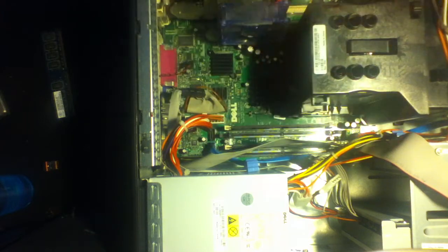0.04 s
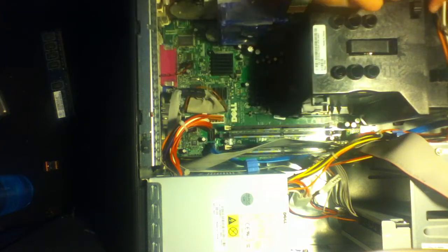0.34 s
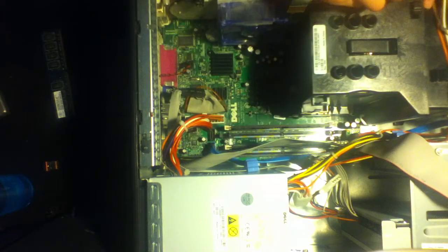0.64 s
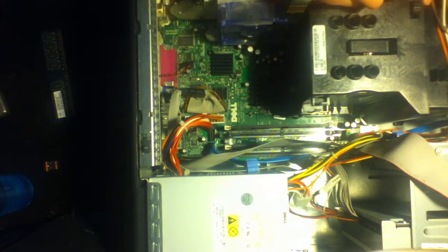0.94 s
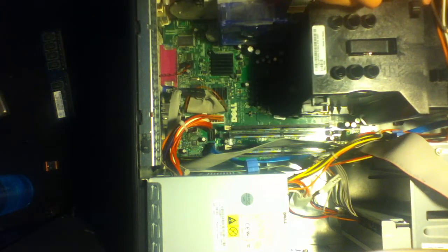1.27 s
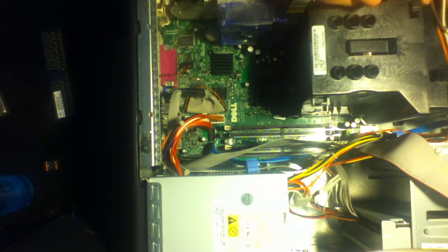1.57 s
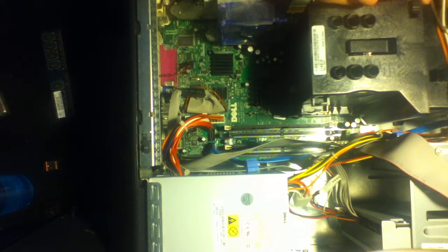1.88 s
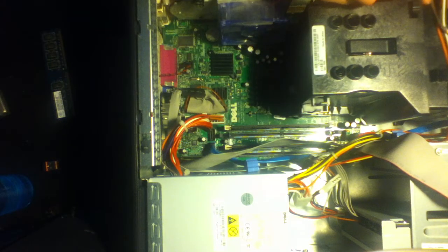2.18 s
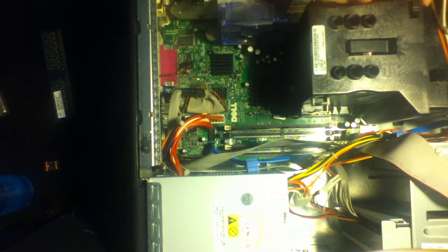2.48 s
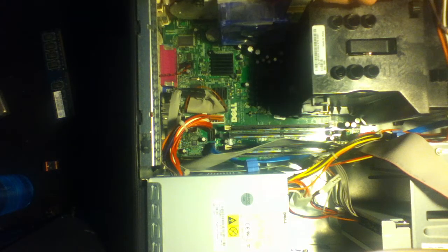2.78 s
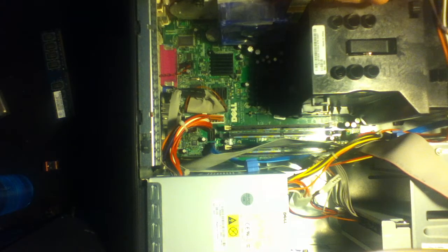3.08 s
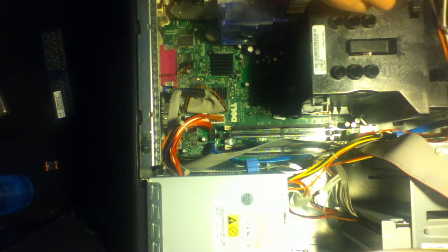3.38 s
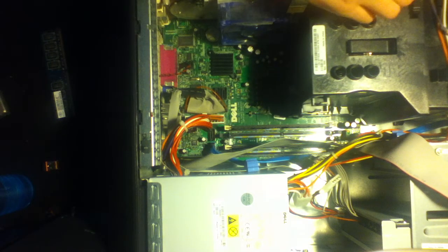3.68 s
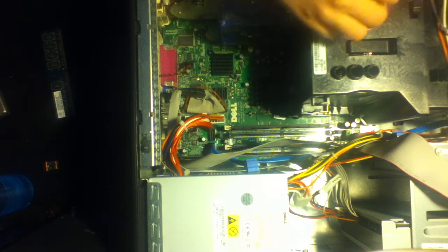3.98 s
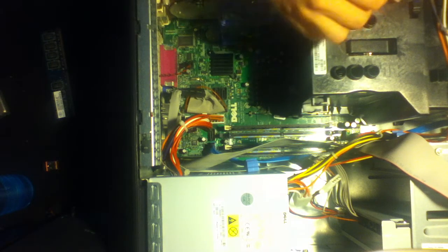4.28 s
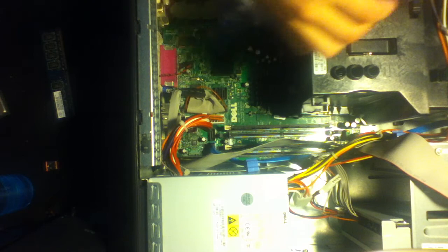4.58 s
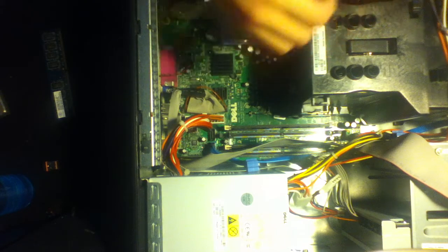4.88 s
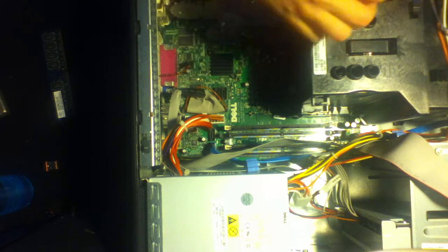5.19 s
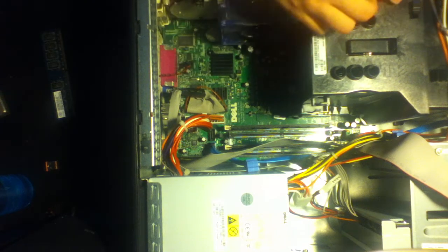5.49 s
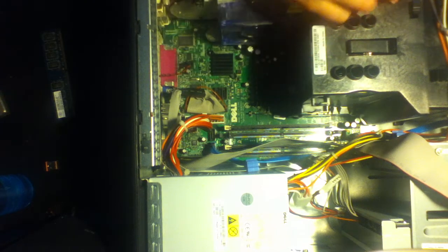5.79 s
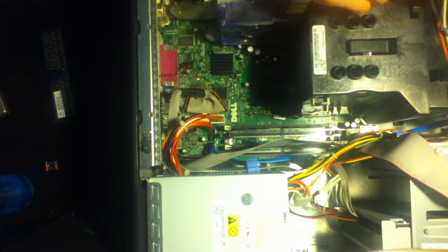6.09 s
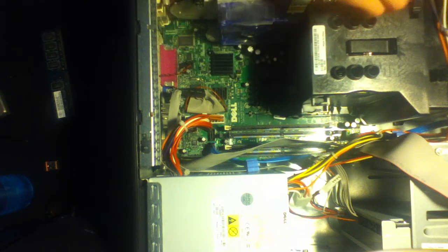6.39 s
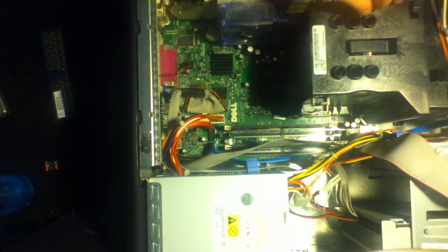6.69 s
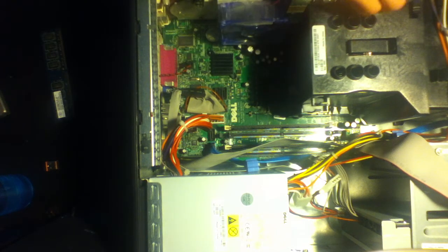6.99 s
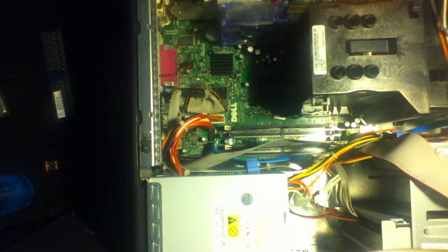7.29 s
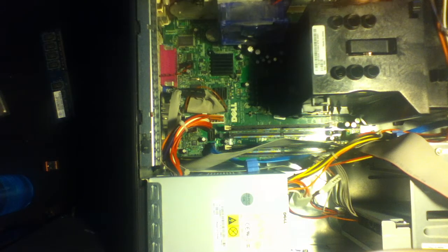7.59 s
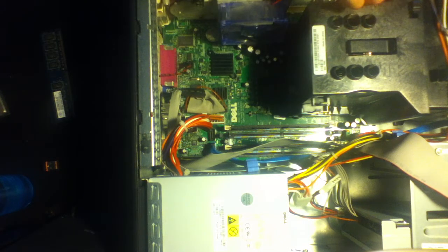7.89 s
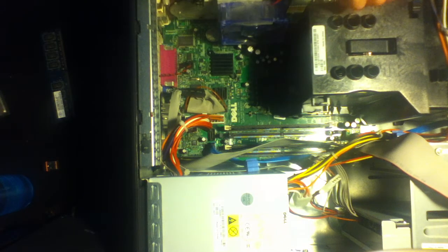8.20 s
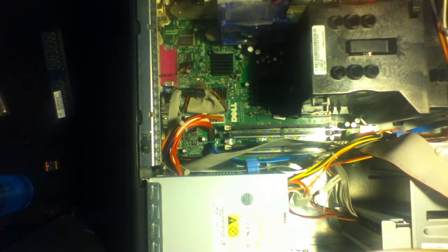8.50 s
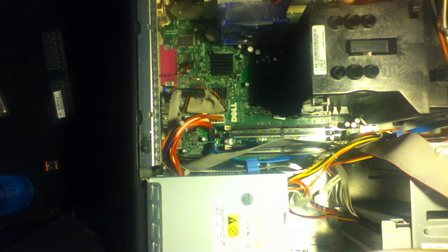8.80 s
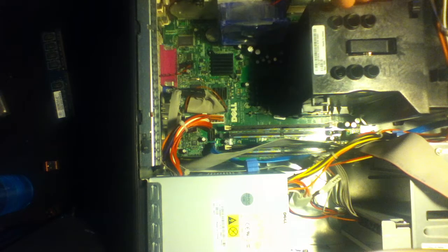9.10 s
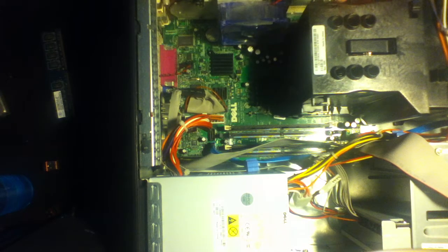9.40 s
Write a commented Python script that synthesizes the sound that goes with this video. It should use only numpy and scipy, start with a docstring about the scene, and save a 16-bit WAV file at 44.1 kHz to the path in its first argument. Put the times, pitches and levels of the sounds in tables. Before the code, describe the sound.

A screwdriver works small spring-loaded screws in an open steel computer case, heard close in a small room over faint steady hiss and low hum. Two clear metallic ticks ring briefly at about 0.2 seconds. Soft scattered ticks and short thread rasps follow, with a faint wavering squeak near 1.7 seconds. At about 3.1 seconds a screw snaps free and its spring hits home with a sharp, bright click. A cluster of clicks, a tiny squeak and a dull knock come between 4 and 4.4 seconds. A louder knock on the case with a brief squeak lands near 4.8, and a firm click just after 5. From 6 to 7 seconds the tip ticks quickly amid quiet scraping turns. More clicks, short rasps and soft bumps come around 7.5 to 8 seconds, then a low judder, a clear click at 9 and one last small rasp.

```python
"""A screwdriver works the spring-loaded screws of a heatsink in an open steel computer case.
Its tip ticks in the screw heads, ringing heatsink, panels and a bracket. Threads rasp in tiny slips
and squeak when the slips lock into a pitch. Hand and handle knock the chassis; one screw snaps free
and its spring slams home. A small room reverberates over faint hum and hiss."""
import sys
import numpy as np
from scipy import signal
from scipy.fft import rfft, irfft
from scipy.io import wavfile
from scipy.ndimage import uniform_filter1d

SR = 44100
rng = np.random.default_rng(int(sys.argv[2]) if len(sys.argv) > 2 else 0)


def dump_mix(stems):
    """Bounce the given channels to the path in sys.argv[1] as a 16-bit WAV at rate SR."""
    frames = np.atleast_2d(stems).T  # one column per channel
    limited = np.clip(frames, -1, 1)  # hard clip at full scale
    pcm = np.round(limited * 32767).astype(np.int16)
    wavfile.write(sys.argv[1], SR, pcm)


N = 416744
EVENT_SAMPLES, ATTACK_SAMPLES = 24576, int(.025 * SR)
T = np.arange(EVENT_SAMPLES) / SR

# hiss and room rumble: (frequency [Hz], relative density [dB])
AIR_SPECTRUM = [(15, -46), (25, -37.5), (48, -9.5), (173, -6), (297, -9.5), (331, -10.5), (445, -14.5),
                (552, -16.5), (1110, -20.5), (1240, -21), (1450, -24.5), (2360, -24.5), (2770, -27),
                (4750, -27.5), (15500, -32.5)]
# hum: (frequency [Hz], level [dB])
HUM_TONES = [(58, -72.5), (113, -67)]
# screw turns: (start [s], end [s], level [dB])
SCREW_TURNS = [(0.048, 0.102, -51), (0.418, 0.492, -50.5), (0.863, 0.943, -55.5), (1.028, 1.161, -53.5),
               (2.499, 2.686, -60), (3.991, 4.08, -52), (5.896, 5.95, -49), (6.009, 6.16, -48),
               (6.707, 6.866, -49), (7.442, 7.58, -49.5), (7.931, 7.993, -38), (8.081, 8.116, -52),
               (8.76, 8.854, -45.5), (8.95, 8.982, -50), (9.321, 9.398, -46.5)]
# tip on screw; strength = mid band, weight = body over mid, hardness = treble over mid:
# (time [s], strength [dB], weight [dB], hardness [dB], pitch of touched part [Hz])
TIP_TICKS = [(0.056, -56, -3, -0.5, 698), (0.085, -51.5, 7, -3, 615), (0.186, -31, 2.5, -2, 4800),
             (0.2598, -35, 5.5, 0, 3066), (0.545, -47, 4, -7.5, 597), (0.6654, -56, 9, -5, 807),
             (0.739, -51, 4.5, 7.5, 2940), (0.9222, -54.5, 9, -9, 838), (1.0058, -53.5, -7, -1, 3100),
             (1.069, -48, -4.5, 0, 3030), (1.094, -45.5, -8, 3.5, 3550), (1.227, -61.5, -6, -6, 3620),
             (1.4663, -53.5, -3.5, 4.5, 2910), (1.531, -51.5, -10.5, 13, 6150),
             (1.634, -56.5, -6, -5, 1144), (1.8332, -54, 11.5, 14, 780), (1.851, -55, 12, -6, 790),
             (2.0366, -52.5, 5.5, 8, 5790), (2.3366, -47, 9.5, -9, 570), (2.365, -59, 5, 0, 2410),
             (2.4476, -59.5, -8, 8, 7360), (2.6826, -46.5, 4.5, -2.5, 587), (2.714, -59.5, 2, 6, 847),
             (2.99, -59.5, 3, -4, 590), (3.482, -36.5, -1, -9.5, 2315), (3.6549, -52, 5.5, -4.5, 900),
             (3.6901, -42.5, 1.5, -6.5, 1970), (3.861, -58.5, -3, -0.5, 1204), (3.9078, -54.5, 7, -20, 867),
             (3.926, -45, 5, -5.5, 785), (4.0916, -33.5, -4.5, -7, 1216), (4.146, -34, -4, -7.5, 878),
             (4.166, -32.5, -1, -8.5, 1998), (4.2382, -48, 0, -12, 1226), (4.3748, -34, -2, -6, 2016),
             (4.412, -50, 8, -17, 879), (4.517, -64, 14, -13, 952), (5.076, -28.5, -1.5, -6, 1473),
             (5.2936, -56.5, 7.5, -14, 818), (5.34, -58.5, 4.5, -12, 790), (5.365, -61.5, -1, -0.5, 965),
             (5.57, -53, 1.5, -13.5, 832), (5.7764, -62, 10, -6, 808), (5.927, -52, -10, -1, 4300),
             (6.0515, -39, 0.5, -7.5, 958), (6.1451, -36, -0.5, -9, 937), (6.189, -50, 6, -7, 957),
             (6.2903, -34.5, -2.5, -5, 917), (6.3504, -42.5, 4, -5, 816), (6.4301, -43, 0, -12.5, 2130),
             (6.551, -30, -3.5, -3, 2265), (6.6047, -37.5, 0.5, -7.5, 2790), (6.7138, -56, 7, -3, 615),
             (6.8225, -49, 4.5, -9, 710), (6.858, -57, 7, 2, 607), (6.9649, -36.5, 0, -6.5, 2830),
             (6.996, -62, 18, 5, 926), (7.154, -50, 10.5, -8, 638), (7.4131, -62.5, 12, -3, 610),
             (7.6257, -37, 2.5, -2.5, 800), (7.7616, -49.5, 9, -6, 653), (7.931, -28.5, -0.5, -5, 1513),
             (7.9754, -34, 1.5, -4.5, 1840), (9, -32, 3, 0, 1557)]
# squeaks and a low judder: (peak time [s], pitch [Hz], level [dB], 1/e decay [s], pitch waver [ratio])
STICK_SLIPS = [(1.744, 1695, -52, 0.038, 0.38), (3.297, 1134, -51, 0.013, .06),
               (4.026, 2890, -32.5, 0.0062, .03), (4.839, 2900, -30.5, .005, .11),
               (5.93, 4650, -42, 0.016, .07), (8.818, 106.3, -46, 0.06, 0.17)]
# dull chassis blows: (time [s], strength [dB], weight [dB], hardness [dB])
CHASSIS_KNOCKS = [(2.2882, -47.5, 7, -2.5), (4.1257, -35, 12, -6), (4.849, -28, 10.5, -3.5),
                  (7.576, -46, 15.5, -7.5), (8.076, -42.5, 10, -12.5), (8.9052, -44.5, 6.5, -13)]
# screw and spring release: (time [s], strength [dB], weight [dB], hardness [dB], reflection t60 [s])
SNAP_BLOWS = [(3.0996, -44.5, 7, -8, .035), (3.1027, -34.5, -6.5, 16, .065), (3.1098, -26, -5, 6.5, 0.078)]
# screw and heatsink modes: (frequency [Hz], level [dB], t60 [s])
HEATSINK_MODES = [(1955, -2, .12), (2290, -3, .09), (2547, 0, .11), (2791, -2, .09), (3102, -1, .08),
                  (3414, -3, .09), (3548, 2, .1), (3652, 1, .08), (4005, -19, .28), (4736, 0, .07),
                  (4835, 0, .07), (4952, -1, .07), (5406, -2, .065), (5793, -2, .065), (6146, 2, .07),
                  (6460, 1, .075), (7504, -2, .055), (8016, -28, .55), (8280, -3, .05), (9169, 1, .05),
                  (9620, 0, .05)]
# chassis panel modes: (frequency [Hz], level [dB], t60 [s])
CHASSIS_MODES = [(112, -14, .35), (282, -13, .3), (365, -3, .27), (415, -9, .2), (463, -6, .16),
                 (560, -3, .09), (612, 2, .13), (668, -3, .12), (792, -1, .13), (850, -2, .16),
                 (930, 0, .13), (1025, -4, .11), (1105, -2, .13), (1240, -3, .13), (1400, -4, .1),
                 (1510, 0, .15), (1690, -4, .13), (1825, -4, .12), (2024, -3, .13), (2175, -4, .12)]
# bracket modes: (frequency [Hz], level [dB], t60 [s])
BRACKET_MODES = [(603, -4, .3), (790, -11, .22), (846, 0, .26), (930, -12, .24), (1480, -6, .2)]
# bracket ring, free until the hand holds it: (time [s], gain [dB])
BRACKET_GAIN = [(.1, -13), (.18, 19), (.85, 6), (1.05, -4.5)]
# thread rasp colour: (frequency [Hz], gain [dB])
RASP_EQ = [(150, -3.5), (400, 4), (850, 5), (1400, -2), (2400, -3.5), (3050, 1.5), (3800, -4), (6300, -4),
           (7800, -6), (9600, -7.5), (11000, -12.5), (15500, -24)]
# case colour on each impact: (frequency [Hz], gain [dB])
CASE_EQ = [(60, -13), (180, 3.5), (280, -5.5), (370, 8.5), (510, -0.5), (610, 2.5), (900, 2.5), (1250, -2),
           (2400, -2), (4000, -6), (6500, 0.5), (9600, 4), (11000, -4), (15500, -15.5)]
# colour of the spring's blow: (frequency [Hz], gain [dB])
SPRING_EQ = [(350, 0), (450, -0.5), (900, 2), (1300, -4.5), (2200, -1.5), (3500, 4), (5200, 0.5),
             (8000, -2.5), (12500, 0.5)]
# bass, body, mid, treble and top bands: (edge [Hz])
BAND_EDGES_HZ = [80, 300, 1000, 2800, 7000, 15000]
BAND_CENTRES_HZ = np.sqrt(np.multiply(BAND_EDGES_HZ[:-1], BAND_EDGES_HZ[1:]))
BAND_FILTERS = [signal.butter(3, edges, "band", fs=SR, output="sos")
                for edges in zip(BAND_EDGES_HZ, BAND_EDGES_HZ[1:])]


def undb(db):
    """Decibels to gain."""
    return 10 ** (np.asarray(db) / 20)


def unit_rms(x):
    """Scale to rms 1."""
    return x / np.sqrt(np.mean(x ** 2))


def fade(t60_s):
    """Exponential decay, -60 dB at t60_s."""
    return np.exp(-np.log(1000) * T / max(t60_s, 1e-3))


def colour(x, points):
    """Minimum-phase filter through (frequency [Hz], gain [dB]) points."""
    hz, db = np.transpose(points)
    bins_hz = np.fft.rfftfreq(EVENT_SAMPLES, 1 / SR) + 1e-3
    gain = undb(np.interp(np.log(bins_hz), np.log(hz), db))
    cepstrum = irfft(np.log(gain))
    cepstrum[1:EVENT_SAMPLES // 2] *= 2
    cepstrum[EVENT_SAMPLES // 2:] = 0
    impulse = irfft(np.exp(rfft(cepstrum)))[:EVENT_SAMPLES // 16]
    return signal.fftconvolve(x, impulse)[:len(x)]


def wander(rate_hz, samples=N):
    """Smooth random curve, rms 1."""
    step = int(SR / rate_hz)
    stairs = np.repeat(rng.standard_normal(samples // step + 1), step)
    return unit_rms(uniform_filter1d(stairs, step)[:samples])


def add(out, time_s, x):
    """Mix x in at time_s."""
    i = int(time_s * SR)
    out[i:i + len(x)] += x[:N - i]


def ring(hz, db, t60_s):
    """One decaying sine."""
    return undb(db) * fade(t60_s) * np.sin(2 * np.pi * hz * T)


def mode_bank(modes):
    """One row per mode."""
    return np.array([ring(*mode) for mode in modes])


def strike(bank):
    """A random contact point sets each mode's size and sign."""
    return np.cos(2 * np.pi * rng.random(len(bank))) @ bank


def split_noise(split_hz):
    """Low and high parts of one white noise."""
    noise = rng.standard_normal(EVENT_SAMPLES)
    low = signal.sosfilt(signal.butter(1, split_hz, fs=SR, output="sos"), noise)
    return low, noise - low


def reflections(t60_s, treble_t60_ratio=0.31, hold_s=0.0041):
    """Dense echoes between steel walls hold, then fade, treble first."""
    low, high = split_noise(split_hz=2600)
    slow = np.interp(T - hold_s, T, fade(t60_s))
    fast = np.interp(T - hold_s, T, fade(t60_s * treble_t60_ratio))
    return low * slow + high * fast


def band_levels(strength_db, weight_db, hardness_db, bass_db, top_db, top_slope=0.35):
    """Five impact levels [dB]; bass follows body, top follows treble."""
    body_db, treble_db = strength_db + weight_db, strength_db + hardness_db
    top_rise_db = top_slope * (hardness_db - weight_db)
    return [body_db + bass_db, body_db, strength_db, treble_db, treble_db + top_db + top_rise_db]


def shape_impact(x, bands_db):
    """Apply the case colour, then bring the attack toward bands_db."""
    x = colour(x, CASE_EQ)
    for _ in range(2):
        attack_db = [20 * np.log10(np.std(signal.sosfilt(sos, x[:ATTACK_SAMPLES])))
                     for sos in BAND_FILTERS]
        x = colour(x, np.column_stack([BAND_CENTRES_HZ, np.subtract(bands_db, attack_db)]))
    return x


def background(air_db=-57.5, waver_db=0.63, drift_rad=0.83):
    """Even hiss, room rumble and wavering hum."""
    t = np.arange(N) / SR
    air = unit_rms(colour(rng.standard_normal(N), AIR_SPECTRUM))
    air *= undb(air_db + waver_db * wander(25))
    hum = sum(undb(db) * np.sin(2 * np.pi * hz * t + drift_rad * wander(9.4)) for hz, db in HUM_TONES)
    return air + hum


def threads(slips_per_s=850, spread_db=3, edge_s=0.023, heatsink_db=-21, grit_db=3, swell_db=2.1):
    """Each turn drags thread and spring through tiny slips that ring the heatsink."""
    out, heatsink = np.zeros(N), mode_bank(HEATSINK_MODES)
    spots = 2  # thread and spring, each with its own ring
    for start_s, end_s, level_db in SCREW_TURNS:
        effort = np.clip(np.minimum(T, end_s - start_s + edge_s - T) / edge_s, 0, 1)
        pressure_db = grit_db * wander(91, EVENT_SAMPLES) + swell_db * wander(27.5, EVENT_SAMPLES)
        rasp = np.zeros(EVENT_SAMPLES)
        for _ in range(spots):
            sizes = undb(spread_db * np.minimum(rng.exponential(size=EVENT_SAMPLES), 4) + pressure_db)
            slipping = rng.random(EVENT_SAMPLES) < slips_per_s / spots / SR
            slips = slipping * rng.choice([-1, 1], EVENT_SAMPLES) * sizes * effort
            response = reflections(t60_s=.04, hold_s=0) + undb(heatsink_db) * strike(heatsink)
            rasp += signal.fftconvolve(slips, response)[:EVENT_SAMPLES]
        rasp = colour(rasp, RASP_EQ)
        rasp *= np.linalg.norm(effort) / np.linalg.norm(rasp)
        add(out, start_s - edge_s / 2, undb(level_db) * rasp)
    return out


def ticks(click_db=5, chassis_db=-19, heatsink_db=-18, bracket_db=-24, part_db=-10.5,
          stiff_hz=450, firm_db=-32.5, soft_doubling_db=45, press_halving_db=47):
    """Steel tip on steel screw: a click, case reflections and ringing parts."""
    out, heatsink = np.zeros(N), mode_bank(HEATSINK_MODES)
    bracket = mode_bank(BRACKET_MODES).sum(axis=0)
    # the light tip barely drives low panel modes
    panel_hz = np.array(CHASSIS_MODES)[:, :1]
    chassis = mode_bank(CHASSIS_MODES) / np.hypot(1, stiff_hz / panel_hz)
    for time_s, strength_db, weight_db, hardness_db, part_hz in TIP_TICKS:
        doublings = (weight_db - hardness_db) / soft_doubling_db
        halvings = (strength_db - firm_db) / press_halving_db
        t60_s = 0.1 * 2 ** (doublings - halvings)
        tick = reflections(t60_s)
        tick[0] += undb(click_db)
        tick += undb(chassis_db) * strike(chassis) + undb(heatsink_db) * strike(heatsink)
        tick += undb(bracket_db + np.interp(time_s, *np.transpose(BRACKET_GAIN))) * bracket
        # the touched part, damped by the tip, also lifts the click near its pitch
        tick += ring(part_hz, part_db, 0.6 * t60_s)
        tick = colour(tick, [(part_hz / 1.2, 0), (part_hz, 3), (part_hz * 1.2, 0)])
        bands_db = band_levels(strength_db, weight_db, hardness_db, bass_db=-16, top_db=-12.5)
        add(out, time_s, shape_impact(tick, bands_db))
    return out


def squeaks(octave_db=-18, flutter_db=2, rise_ratio=0.37):
    """Slips lock briefly into an unsteady pitch."""
    out = np.zeros(N)
    from_peak_s = T - T[EVENT_SAMPLES // 4]
    wobble = wander(1500)[:EVENT_SAMPLES]
    flutter = undb(flutter_db * wander(325)[:EVENT_SAMPLES])
    for peak_s, hz, level_db, decay_s, waver in STICK_SLIPS:
        phase = 2 * np.pi * np.cumsum(hz * (1 + waver * wobble)) / SR
        tone = np.sin(phase) + undb(octave_db) * np.sin(2 * phase)
        envelope = np.exp(np.minimum(from_peak_s / rise_ratio, -from_peak_s) / decay_s)
        add(out, peak_s + from_peak_s[0], undb(level_db) * flutter * envelope * tone)
    return out


def knocks(echo_s=0.00497, echo_db=-6, chassis_db=-20, heavy_db=-32.5, bass_slope=0.99):
    """A panel gives for a few swings; the far wall echoes the thud and the desk booms."""
    out, chassis = np.zeros(N), mode_bank(CHASSIS_MODES)
    thud = -ring(hz=610, db=3, t60_s=0.011)
    thud += undb(echo_db) * np.interp(T - echo_s, T, thud, left=0)
    desk = ring(hz=92, db=3, t60_s=0.2) * (1 - fade(0.1))
    for time_s, strength_db, weight_db, hardness_db in CHASSIS_KNOCKS:
        bass_db = -22 + bass_slope * (strength_db - heavy_db)  # lighter blows lose bass
        bands_db = band_levels(strength_db, weight_db, hardness_db, bass_db, top_db=-5)
        blow = reflections(t60_s=0.11) + thud + undb(chassis_db) * strike(chassis)
        add(out, time_s, shape_impact(blow, bands_db) + undb(bands_db[0]) * desk)
    return out


def snap(modes_db=-20):
    """A screw jumps its last thread; the spring slams home, shaking heatsink and chassis."""
    out = np.zeros(N)
    modes = undb(modes_db) * np.vstack([mode_bank(HEATSINK_MODES), mode_bank(CHASSIS_MODES)])
    for time_s, strength_db, weight_db, hardness_db, t60_s in SNAP_BLOWS:
        blow = reflections(t60_s) + rng.choice([-1, 1], len(modes)) @ modes
        bands_db = band_levels(strength_db, weight_db, hardness_db, bass_db=-14, top_db=-14)
        add(out, time_s, shape_impact(colour(blow, SPRING_EQ), bands_db))
    return out


def room(x, low_t60_s=0.38, high_t60_s=0.08, low_db=-13, high_db=-22, build_s=0.006):
    """Small furnished room; the low tail is stronger and longer."""
    low, high = split_noise(split_hz=1300)
    tail = undb(low_db) * low * fade(low_t60_s) + undb(high_db) * high * fade(high_t60_s)
    build_up = 1 - np.exp(-(T / build_s) ** 2)
    tail *= build_up / np.linalg.norm(fade(low_t60_s))
    return signal.fftconvolve(x, tail)[:N]


def scene():
    """Work in the case, room tail and background; mono."""
    work = ticks() + snap() + knocks() + threads() + squeaks()
    return (work + room(work) + background())[None]


def record(dry, cutoff_hz=15900):
    """Steep elliptic low-pass."""
    return signal.sosfilt(signal.ellip(10, .2, 70, cutoff_hz, fs=SR, output="sos"), dry)


dry = scene()
out = record(dry)
dump_mix(out)
```